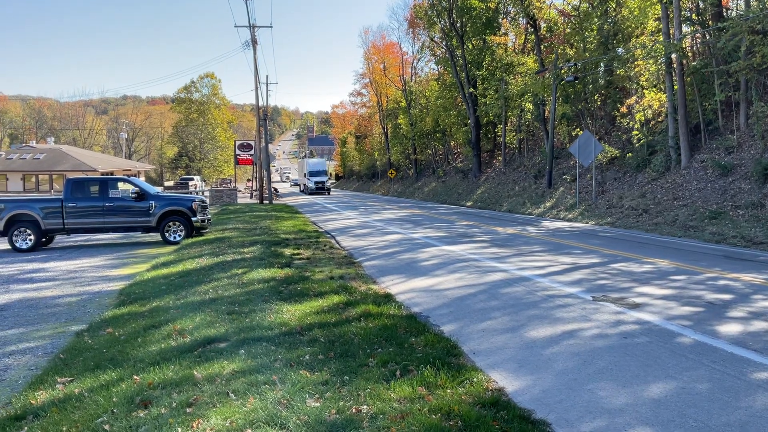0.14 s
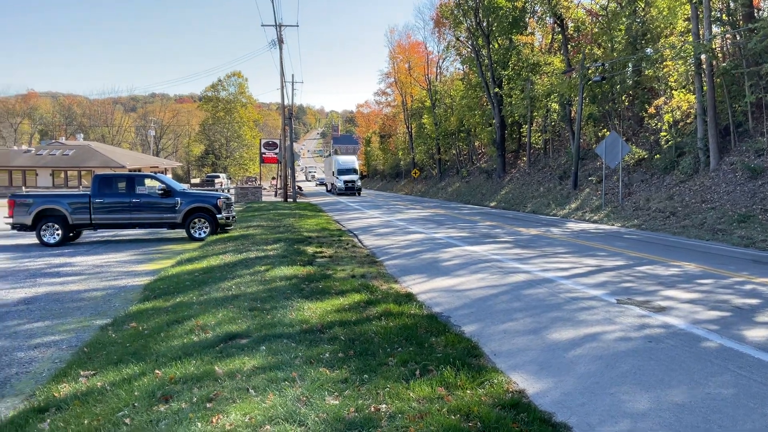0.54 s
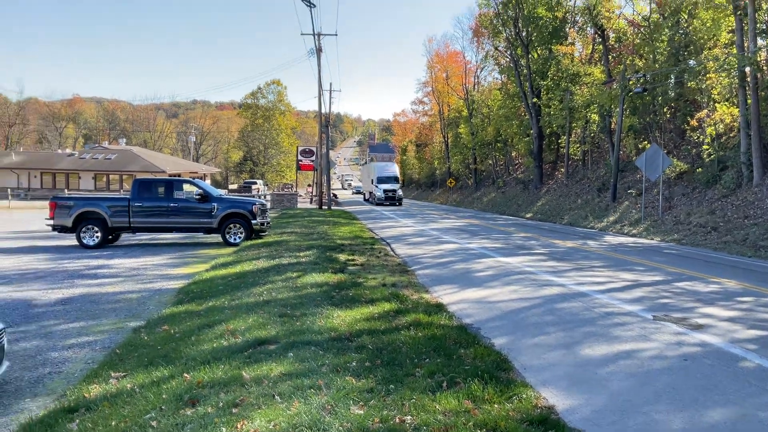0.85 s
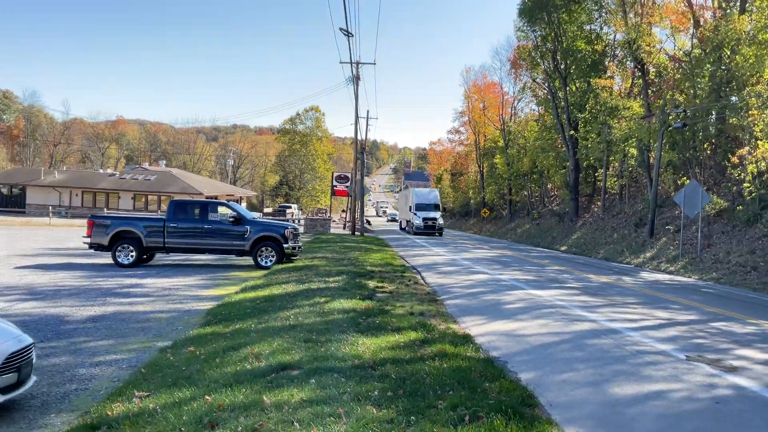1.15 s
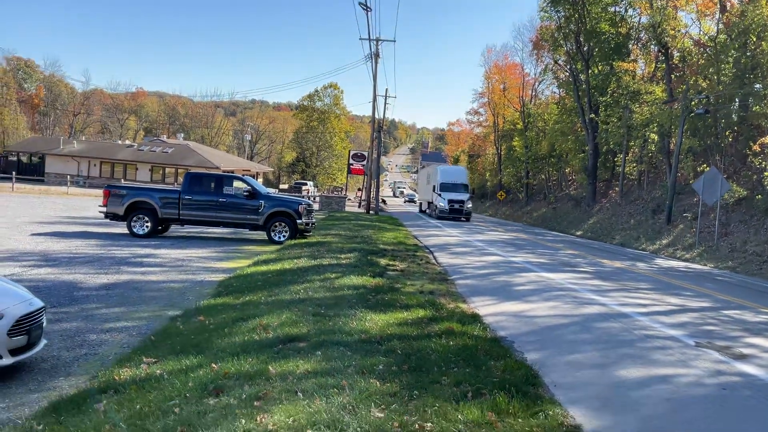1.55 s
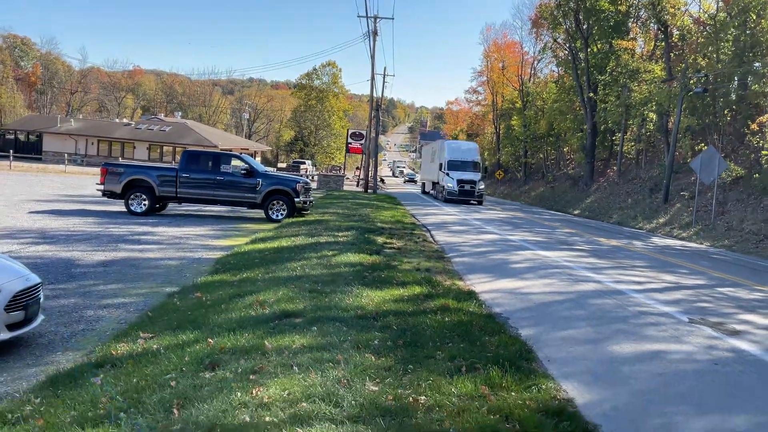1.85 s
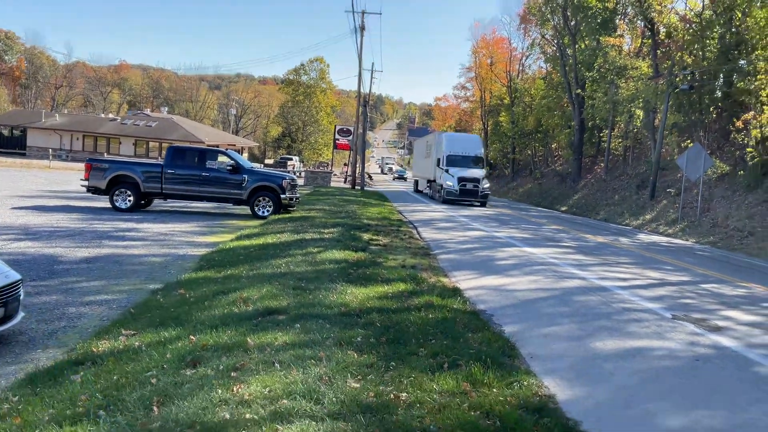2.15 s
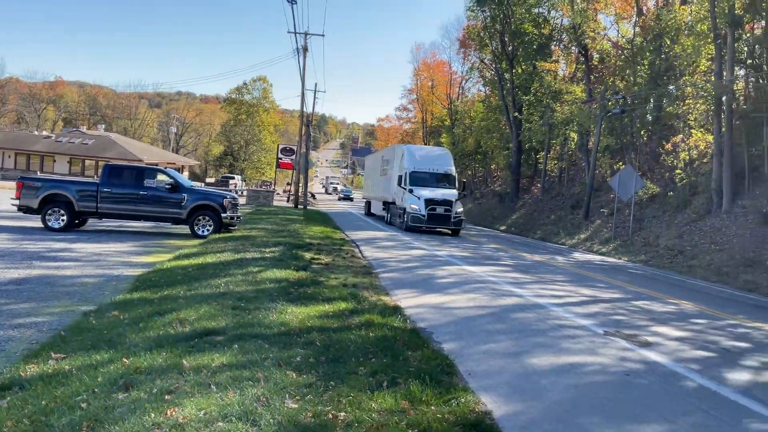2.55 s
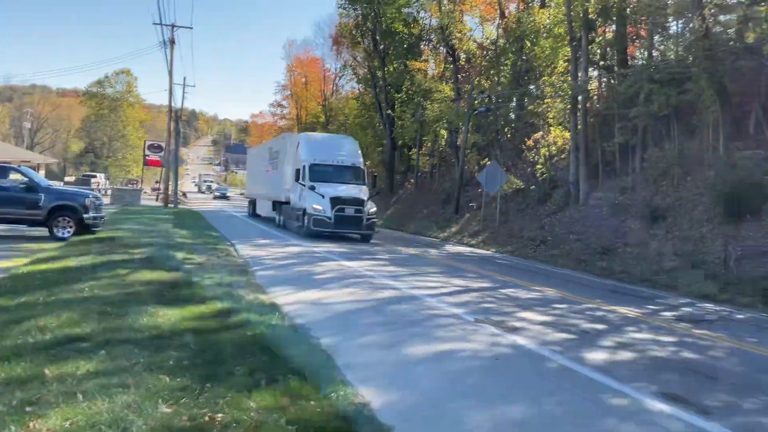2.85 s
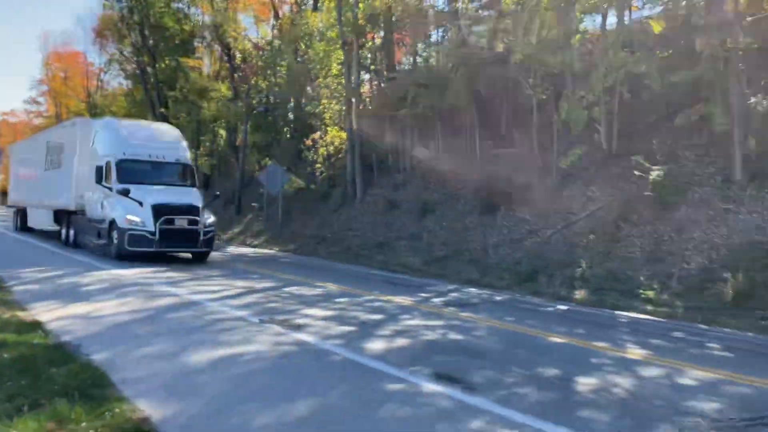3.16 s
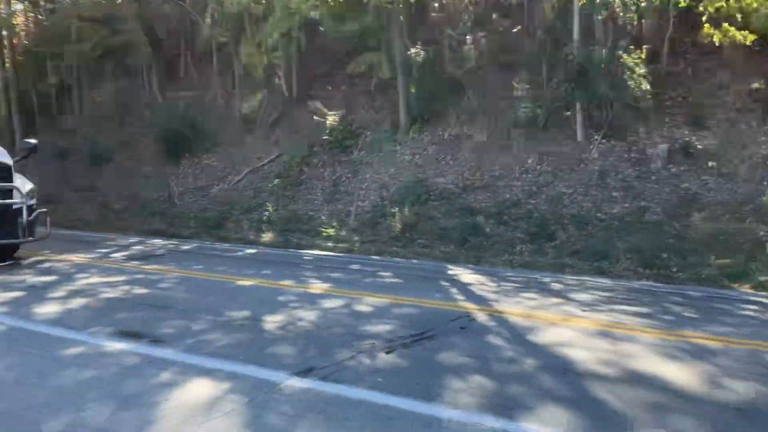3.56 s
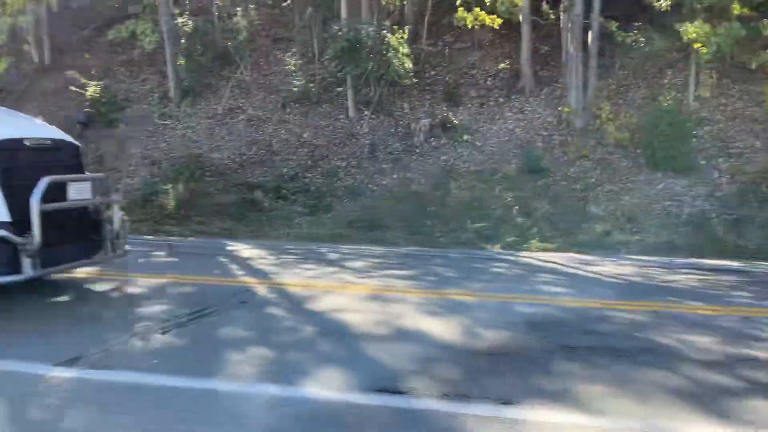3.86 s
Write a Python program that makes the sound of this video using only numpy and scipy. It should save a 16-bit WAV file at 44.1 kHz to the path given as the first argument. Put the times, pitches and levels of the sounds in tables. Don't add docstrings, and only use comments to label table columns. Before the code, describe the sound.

A semi truck's air horn sounds two short, loud, reedy blasts at about 3.3 and 3.7 seconds, echoing off a wooded hillside. Before them, distant traffic, a far idling engine and a thin insect; light handling taps at 0.2-0.4. Tyre roar and low coasting engine swell throughout, with a faint tread whine from 0.8 to 2.4 and falling turbo whistle. Close handling thuds accompany the horn, outdoors on a phone.

```python
import sys
import numpy as np
from scipy import signal
from scipy.fft import rfft, irfft, next_fast_len
from scipy.io import wavfile

SR = 44100
rng = np.random.default_rng(int(sys.argv[2]) if len(sys.argv) > 2 else 0)


def generate_wav(sig):
    pcm = np.round(np.clip(np.atleast_2d(sig).T, -1, 1) * 32767).astype(np.int16)
    wavfile.write(sys.argv[1], SR, pcm)


def convert_level_to_amplitude(level_db):
    exponent = np.asarray(level_db, float) / 20
    return 10 ** exponent


N = 176400
T = np.arange(N) / SR


def in_time(rows):
    s, *columns = np.transpose(rows)
    return [np.interp(T, s, c) for c in columns]


def at_hz(points, hz, axis=1):
    p = np.array(points)
    return np.interp(np.log(hz + 1e-9), np.log(p[:, 0]), p[:, axis])


def filtered(x, order, hz, kind):
    return signal.sosfilt(signal.butter(order, hz, kind, fs=SR, output="sos"), x)


def drift(rate, size=N):
    r = np.exp(-80 * np.pi * rate / SR)
    slow = signal.lfilter([1], [1, -2 * r, r * r], rng.standard_normal(size // 40 + 2002))[2000:]
    return np.interp(np.arange(size) / 40, np.arange(len(slow)), slow / slow.std())


def tone(hz, db):
    return np.sqrt(2) * convert_level_to_amplitude(db) * np.sin(2 * np.pi * np.cumsum(hz) / SR)


def during(rows):
    return (T > rows[0][0]) * (T < rows[-1][0])


def whine(rows, wander_hz, patchy_db):
    hz, db = in_time(rows)
    return tone(hz + wander_hz * drift(80.6), db + patchy_db * drift(33)) * during(rows)


def banded(spectrum, level_db, patchy_db, swell_db=0):
    # f/Hz, share/1
    swell_share = [(40, 2.36), (150, 0.66), (700, 0.72), (2000, 0.95), (5000, 0.86), (8000, 1.22),
                   (11500, 2.8)]
    out, power, together = 0, 0, drift(2.5)
    edges_hz = 28 * 2 ** np.arange(0, 9.2, 1 / 3)
    white = rng.standard_normal((2, 2, N))
    for k, (low, high) in enumerate(zip(edges_hz, edges_hz[1:])):
        band = filtered(white[k % 2], 3, [low, high], "band")
        hz = np.sqrt(low * high)
        band_db = at_hz(spectrum, hz)
        power += convert_level_to_amplitude(2 * band_db) * 2.2 * (high - low) / SR
        flicker_db = patchy_db * (0.28 * together + drift(9.3))
        out = out + band * convert_level_to_amplitude(band_db + at_hz(swell_share, hz) * swell_db + flicker_db)
    return out * convert_level_to_amplitude(level_db) / np.sqrt(power)


def approach():
    # t/s, level/dB
    nearness = [(0, -60), (1.22, -57), (1.97, -51.5), (2.3, -50), (2.96, -46.5), (3.3, -43), (3.6, -41.5),
                (4, -41.5)]
    near_db, = in_time(nearness)
    return near_db - near_db[-1]


def tyre_roar(swell_db):
    # f/Hz, density/dB per Hz
    roar_spectrum = [(40, -7), (110, -1.5), (250, -7), (450, -14), (750, -7), (1800, -14.5), (5000, -31),
                     (13000, -50.5)]
    return banded(roar_spectrum, -23.5, patchy_db=1.6, swell_db=swell_db)


def tread_song():
    # t/s, f/Hz, level/dB
    tread_line = [(.75, 1207, -70), (.9, 1190, -43.5), (1.5, 1175, -40.5), (1.9, 1153, -48),
                  (2.4, 1158, -49)]
    return whine(tread_line, 50, 3)


def turbo():
    # t/s, f/Hz, level/dB
    upper_line = [(1.7, 15700, -92), (2.07, 14600, -85), (2.3, 14030, -84), (2.75, 13300, -80),
                  (3.2, 12650, -74), (3.9, 12100, -68)]
    # t/s, f/Hz, level/dB
    lower_line = [(.3, 10200, -95), (.7, 9500, -86), (1.2, 8700, -83), (1.55, 8150, -81), (1.8, 7800, -90)]
    return whine(upper_line, 45, 1.5) + whine(lower_line, 70, 3)


def truck_engine(swell_db):
    # multiple/1 of 28.07 Hz, level/dB
    orders = [(2, -39), (3, -35.5), (4, -41)]
    out = 0
    for k, db in orders:
        out = out + tone(k * 28.07 + 3.0 * drift(6.5), db + 0.81 * swell_db + 5.6 * drift(4.1))
    return out


def swishes():
    # t/s, length/s, level/dB
    patches = [
        (1.6, .04, -66),
        (2.07, .035, -64),
        (2.3, .035, -63),
        (2.75, .05, -66),
        (3.065, .004, -58),
    ]
    hiss = filtered(rng.standard_normal(N), 3, [3000, 10500], "band")
    return hiss * sum(convert_level_to_amplitude(db) * np.exp(-((T - s) / w) ** 2) for s, w, db in patches)


def add(out, start, attack, hold, hz, db, bell, count, tilt_db=0, first_db=0, phase=0., step_rows=None):
    # f/Hz, level/dB
    bell_treble = [(2900, -21), (3600, -20), (4400, -25), (5300, -20), (6300, -18), (7300, -39),
                   (9100, -26.5), (10800, -43), (12700, -44), (15500, -39)]
    t = np.arange(int((hold + .16) * SR)) / SR
    start_sharp, treble_lag_s, release_s = .015, .016, .026
    turns = phase + 2 * np.pi * (hz * t - 292 * start_sharp * attack * np.exp(-t / attack))
    wave, early = 0, np.exp(-np.maximum(t - hold + 0.037, 0) / 0.072)
    for k in range(1, count + 1):
        partial_db = bell[k - 1] if k <= 9 else bell[9] + at_hz(bell_treble, k * hz)
        partial_db += tilt_db * np.log2(k) + first_db * (k == 1)
        rise_s = attack + treble_lag_s * np.log2(k / 3 + .7) ** 2 / 6
        rise = np.sin(np.pi / 2 * np.minimum(t / rise_s, 1)) ** 2
        flutter_db = 2.8 * np.clip(k - 3, 0, 4) / 4 * drift(14, size=len(t))
        if step_rows and k > 3:
            when, before_db = step_rows[min(k, 10) - 4]
            flutter_db = flutter_db + before_db / (1 + np.exp((t - when) / 0.0045))
        ragged_s = .035 * (k > 3) * rng.random()
        fall = np.exp(-np.maximum(t - hold + ragged_s, 0) / release_s) ** k ** 0.44
        if k > 9:
            fall = fall * early
        turn = np.pi * ((k > 1) + 2 * (k > 3) * rng.random())
        turn = turn + .7 * (k > 9) * drift(30, size=len(t))
        wave = wave + convert_level_to_amplitude(partial_db + flutter_db) * rise * fall * np.cos(k * turns + turn)
    i = int(start * SR)
    out[i:i + len(t)] -= (np.sqrt(2) * convert_level_to_amplitude(db) * wave)[:max(N - i, 0)]


def horn():
    # t/s, attack/s, hold/s, f/Hz, level/dB
    blasts = [
        (3.257, 0.026, 0.14, 292.1, -14),
        (3.675, 0.0093, 0.17, 291, -17),
    ]
    # level/dB of partials 1-9, then of the treble
    bell_partials = [
        [0, -15.5, -4.5, -11, -13.5, -13, -20, -25, -20, -6],
        [0, -20.5, -1.5, -13, -9, -15.5, -19, -6, -16.5, 2],
    ]
    # pitch excess/1, t/s when the third partial cancels, delay/s, level/dB
    near_bounce = [
        (.004, 3.425, .015, -7),
        (.0065, 3.785, .002, -2),
    ]
    # t/s after start, level/dB before it,
    # relative to after
    partial_steps = [
        [(0.037, -1), (.09, -4), (0.041, -7.5), (.075, -4), (0.018, 0.5), (0.064, -8), (0.11, -1)],
        [(.1, -13), (0.094, -9), (0.035, -11), (0.11, 8), (0.069, -23), (0.057, -3), (0.06, -5)],
    ]
    out, air = np.zeros(N), np.zeros(N)
    for blast, bell, bounce, step_rows in zip(blasts, bell_partials, near_bounce, partial_steps):
        s, attack, hold, hz, db = blast
        sharp, null_s, lag, bounce_db = bounce
        add(out, s, attack, hold, hz, db, bell, count=53, step_rows=step_rows)
        phase = np.pi / 3 + 2 * np.pi * hz * ((null_s - s) - (1 + sharp) * (null_s - s - lag))
        add(out, s + lag, attack, hold + 0.022, hz * (1 + sharp), db + bounce_db, bell, count=3,
            first_db=-6.5, phase=phase)
        breath = np.interp(T, [s, s + 0.012], [0, 1]) * np.exp(-np.maximum(T - s - hold, 0) / 0.16)
        air += convert_level_to_amplitude(db + bell[9] - 14) * breath
        for n, (late, off) in enumerate(rng.random((9, 2))):
            late = .11 + .025 * (n + late)
            hill_hz = blasts[0][3] * (1 + 0.026 + 0.018 * (off - .5))
            hill_db = db - 15 - 60 * late / 1.17
            add(out, s + late, .03, hold * 0.37, hill_hz, hill_db, bell, count=4, tilt_db=1, first_db=5.0)
    return out + air * filtered(rng.standard_normal(N), 2, [2500, 6800], "band")


def trees(x):
    t = np.arange(SR // 2) / SR
    echo = rng.standard_normal(len(t)) * convert_level_to_amplitude(-60 * t / 0.48) * np.minimum(t / 0.019, 1)
    wet = signal.fftconvolve(x, echo / np.sqrt(np.sum(echo ** 2)))[:N]
    return x + convert_level_to_amplitude(-9.5) * filtered(wet, 2, 745, "high")


def bank_returns():
    # t/s, f/Hz of the first partial, its level/dB, level/dB of the third
    bank_lines = [
        [(3.39, 299.9, -26, -48), (3.43, 300.9, -28.5, -43), (3.5, 303.2, -31, -31), (3.6, 300.4, -34, -35),
         (3.66, 301.4, -45, -29)],
        [(3.83, 296.5, -38, -46), (3.87, 295.3, -29, -26), (3.91, 304, -20, -28), (3.94, 308, -25, -31),
         (3.96, 312, -48, -29), (4, 320, -35, -25)],
    ]
    out = 0
    for rows in bank_lines:
        hz, first_db, third_db = in_time(rows)
        hz = hz + 3.02 * drift(29.8)
        first = tone(hz, first_db + 1.0 * drift(14))
        third = tone(3 * hz, third_db + 5.2 * drift(31))
        out = out + (first + third) * during(rows)
    return out


def knocks():
    # t/s, f/Hz, level/dB, t60/s
    blows = [
        (.224, 773, -27, .07),
        (.361, 765, -21, 0.054),
        (3.565, 111, -20, 0.061),
        (3.639, 120, -10, 0.035),
        (3.865, 192, -16, 0.07),
        (3.908, 149, -13, 0.075),
        (3.95, 185, -14.5, 0.13),
        (3.961, 70, -15, .2),
    ]
    out = np.zeros(N)
    for s, hz, db, t60 in blows:
        t = np.maximum(T - s, 0)
        out += convert_level_to_amplitude(db - 60 * t / t60) * (1 - np.exp(-t / 0.0027)) * np.sin(2 * np.pi * hz * t)
    return out


def distant_idle():
    sag_hz_per_s, wander_hz = 1.493, 4.83
    return tone(88.8 - sag_hz_per_s * T + wander_hz * drift(7.5), -39.5 + 0.8 * drift(22))


def insect():
    # t/s, f/Hz, level/dB
    insect_line = [(0, 7550, -75), (1, 7550, -76), (2.2, 7550, -80), (2.6, 7550, -105)]
    return whine(insect_line, 90, 3)


def distant_traffic():
    # f/Hz, density/dB per Hz
    traffic_spectrum = [(40, -13.5), (90, 1), (200, -5.5), (450, -21.5), (800, -23), (1700, -12),
                        (4000, -34), (11000, -61)]
    return filtered(banded(traffic_spectrum, -36, patchy_db=1.53), 14, 10300, "low")


def ports(x, other=0, axis=2, shade=1.0):
    # f/Hz, phase/rad
    port_lead = [(60, 0), (300, .7), (560, 2.1), (1400, 1.1), (2400, -2.1), (2950, -3.14), (3300, -4.3),
                 (3700, -5.5), (7300, -6.28)]
    # f/Hz, level/dB
    port_shade = [(50, 0), (280, -2.5), (500, -3), (850, 8), (1250, 1.5), (2000, -4.5), (2950, -0.8),
                  (4500, -1.5), (6500, -7.5), (7500, 0.9)]
    # f/Hz, far/1, near/1
    port_spread = [(212, 0.0035, 0.005), (445, 0.21, 0.39), (686, 0.15, 0.71), (960, 0.97, 0.046),
                   (1810, 0.62, 0.19), (3030, 0.12, 0.069), (5900, .1, 0.045), (7800, .001, .001)]
    size = next_fast_len(N + 4096)
    hz = np.arange(size // 2 + 1) * SR / size
    unrelated = np.clip(at_hz(port_spread, hz, axis), 0, 1) * np.any(other)
    half = convert_level_to_amplitude(shade * at_hz(port_shade, hz) / 2) * np.exp(.5j * at_hz(port_lead, hz))
    a = np.sqrt(1 - unrelated / 2) * rfft(x, size)
    b = np.sqrt(unrelated / 2) * rfft(other + 0 * x, size)
    case_dip_db = -2 * np.exp(-((hz - 2406) / 300) ** 2)
    norm = np.sqrt(2 / (abs(half) ** 2 + abs(half) ** -2)) * convert_level_to_amplitude(case_dip_db)
    return irfft(norm * np.array([(a + b) * half, (a - b) / half]), size)[:, :N]


def scene():
    swell_db = approach()
    truck = tread_song() + turbo() + truck_engine(swell_db) + swishes()
    blasts_heard = trees(horn()) + bank_returns()
    point_sources = truck + blasts_heard + knocks() + distant_idle() + insect()
    roar, traffic = tyre_roar(swell_db), distant_traffic()
    return ports(*roar) + ports(*traffic, axis=1, shade=0.12) + ports(point_sources)


def band_limit(x):
    return signal.sosfilt(signal.butter(12, 15880, fs=SR, output="sos"), x)


def record(dry):
    x = filtered(dry, 2, 45, "high")
    x = x + convert_level_to_amplitude(-86) * filtered(rng.standard_normal(N), 6, [11700, 14500], "band")
    return band_limit(1.381 * np.tanh(x / 1.201))


dry = scene()
out = record(dry)
generate_wav(out)
```